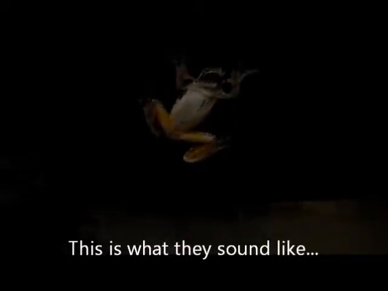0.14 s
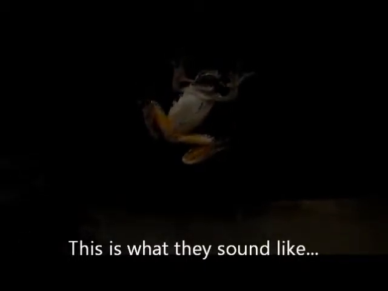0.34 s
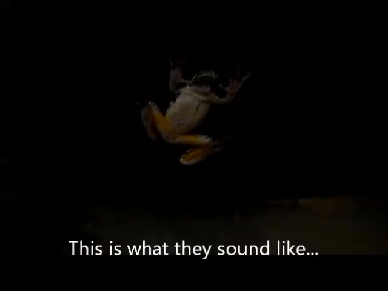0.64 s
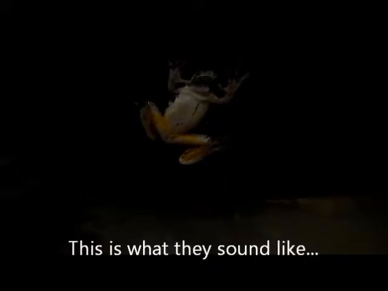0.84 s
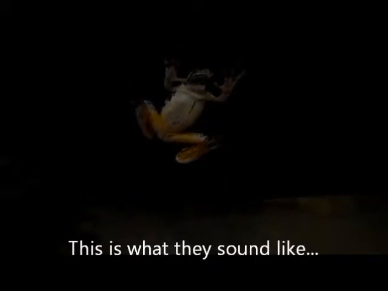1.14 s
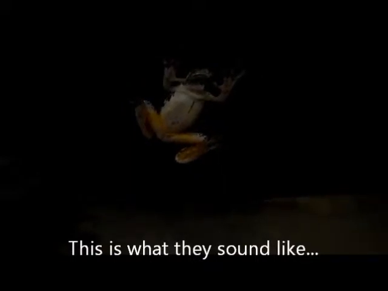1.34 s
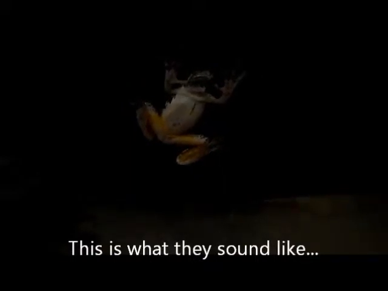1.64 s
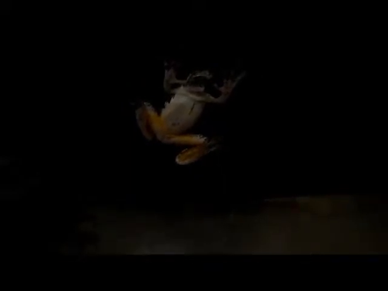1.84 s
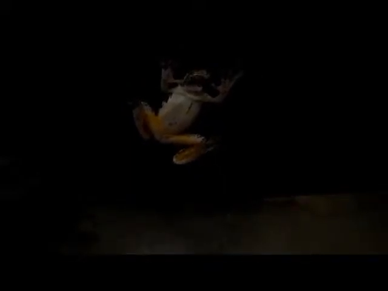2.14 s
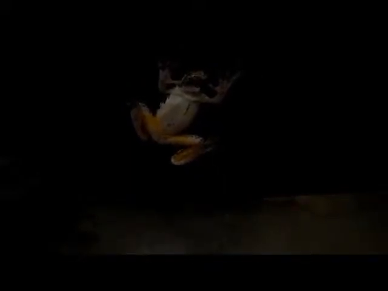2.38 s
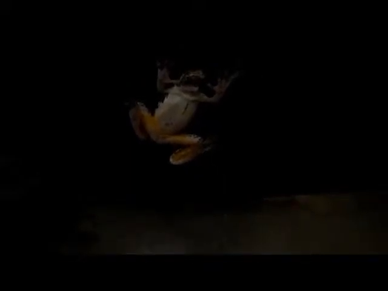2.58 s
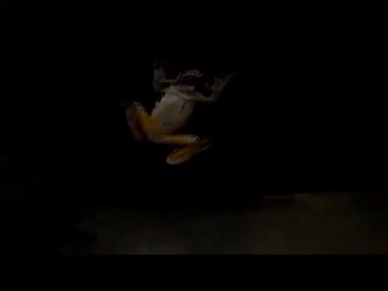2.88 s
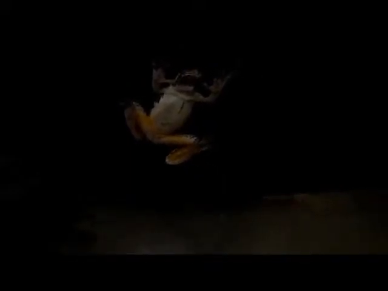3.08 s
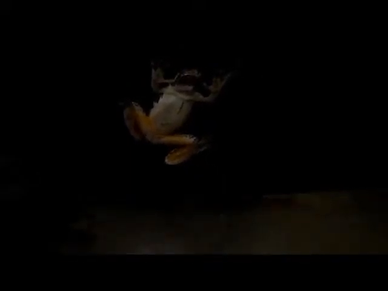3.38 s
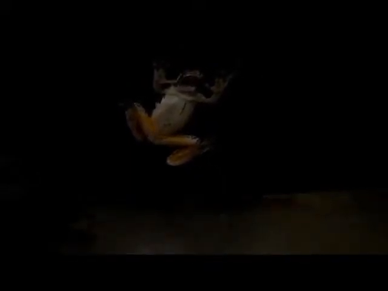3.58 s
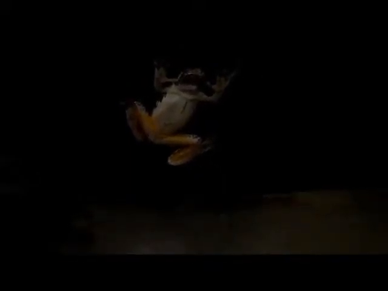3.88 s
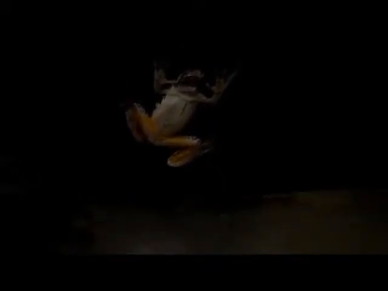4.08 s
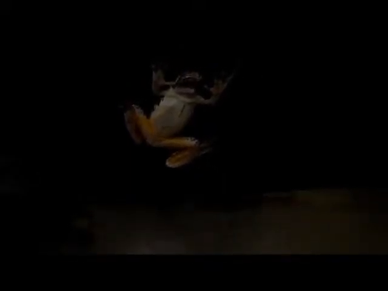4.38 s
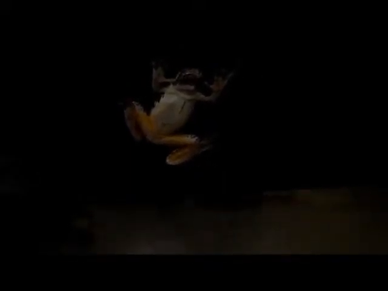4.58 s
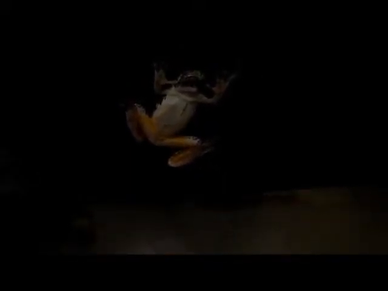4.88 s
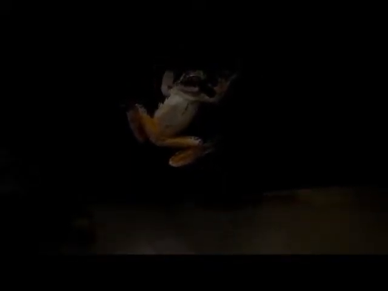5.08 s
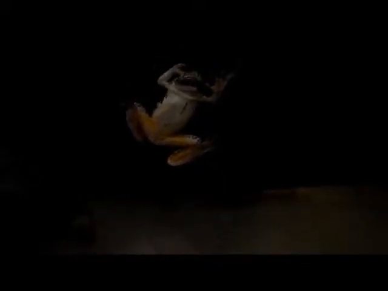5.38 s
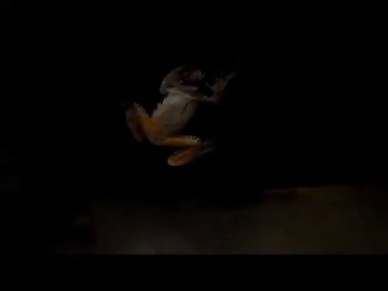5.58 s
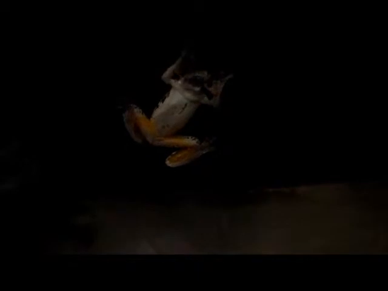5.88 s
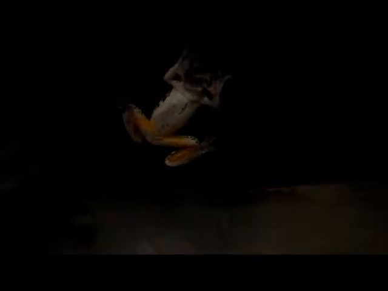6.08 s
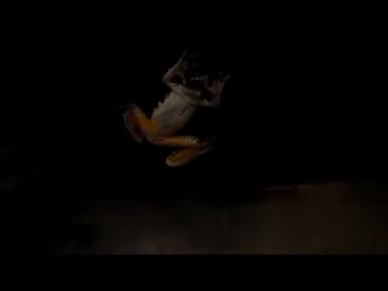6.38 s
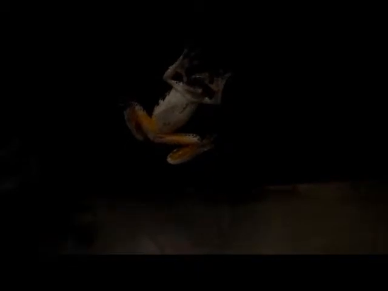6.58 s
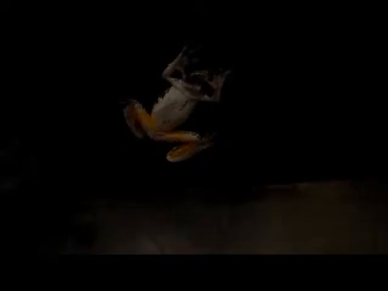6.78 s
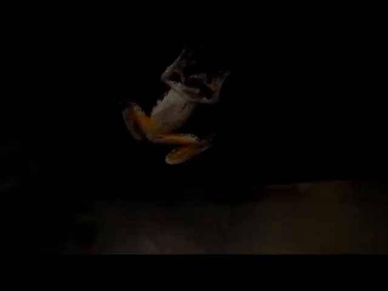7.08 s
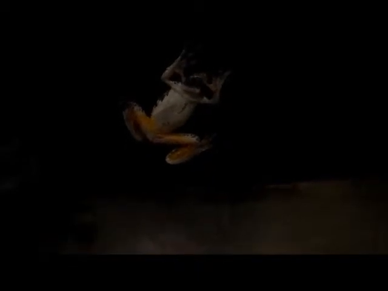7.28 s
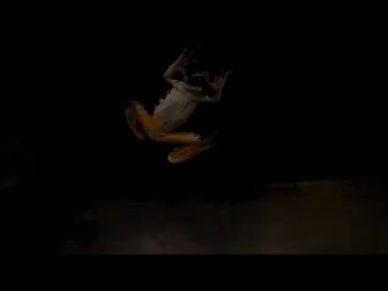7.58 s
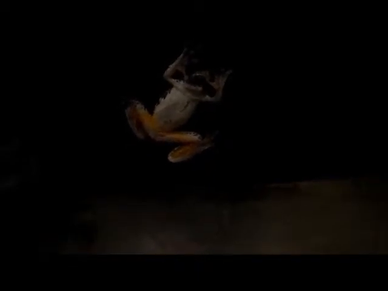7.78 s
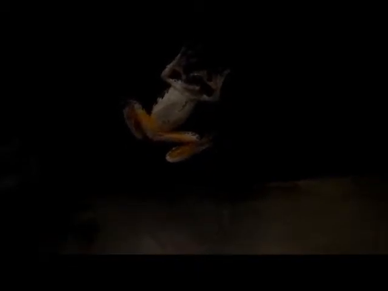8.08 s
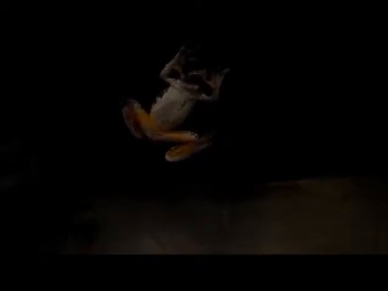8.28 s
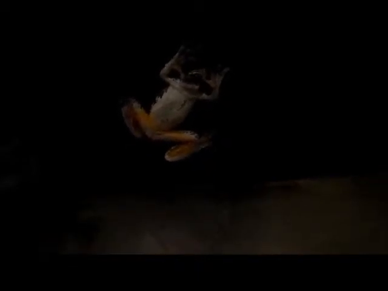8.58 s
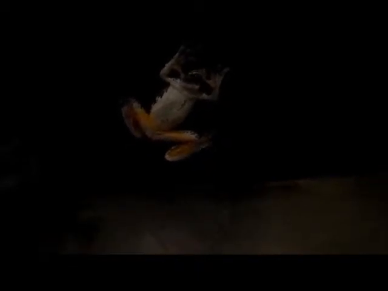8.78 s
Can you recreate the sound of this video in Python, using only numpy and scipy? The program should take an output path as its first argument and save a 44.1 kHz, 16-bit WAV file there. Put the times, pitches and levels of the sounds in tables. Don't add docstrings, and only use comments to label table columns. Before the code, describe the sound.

At a night pond, brief croaky frog trills come and go amid thin rising peeps, a high chorus drone, faint hiss and far rumble.

```python
import sys
import numpy as np
from scipy import signal
from scipy.fft import rfft, irfft, next_fast_len
from scipy.io import wavfile
from scipy.ndimage import uniform_filter1d, map_coordinates

SR = 44100
rng = np.random.default_rng(int(sys.argv[2]) if len(sys.argv) > 2 else 0)


def bounce(signal):
    frames = np.transpose(np.atleast_2d(signal))
    limited = np.clip(frames, -1, 1)
    pcm = np.round(limited * 32767).astype(np.int16)
    wavfile.write(sys.argv[1], SR, pcm)


def amplitude_ratio(level_db):
    exponent = np.asarray(level_db, float) / 20
    return 10 ** exponent


N = 394254


def unit(x):
    return x / np.sqrt(np.mean(x ** 2) + 1e-20)


def along(points, hz):
    f, v = np.transpose(points)
    return np.interp(np.log(hz + 1), np.log(f + 1), v)


def over_time(points):
    return np.interp(np.arange(N) / SR, *np.transpose(points))


def wobble(rate):
    knots = rng.standard_normal(int(N * rate / SR) + 4)
    return map_coordinates(knots, [np.arange(N) * rate / SR])


def filtered(x, response):
    m = next_fast_len(N + SR // 2)
    return irfft(rfft(x, m) * response(np.fft.rfftfreq(m, 1 / SR)), m)[..., :N]


def rush(spectrum, alike):
    def mid_side(hz):
        turn = np.arccos(np.clip(along(alike, hz), -1, 1)) / 2
        return amplitude_ratio(along(spectrum, hz)) * [np.cos(turn), np.sin(turn)]

    mid, side = filtered(rng.standard_normal((2, N)), mid_side)
    return unit(np.array([mid + side, mid - side]))


def add(track, s, sound):
    part = track[..., round(s * SR):][..., :sound.shape[-1]]
    part += sound[..., :part.shape[-1]]


def envelope(u, db, tilt_db, on, attack_db, off, release_db):
    attack = attack_db * np.clip(on - u, 0, 9) ** 2
    release = release_db * np.clip(u - off, 0, 9) ** 2
    return amplitude_ratio(db + tilt_db * u - attack - release)


# pitch_hz, level_db (per Hz)
HUM = [(53, -23), (90, -10), (118, 0.5), (177, -4.5), (200, -3.5), (252, -7.5), (546, -19.5), (992, -26.5),
       (1200, -29.5), (1410, -27.5), (2150, -33.5), (2300, -36), (2990, -34), (5060, -120)]
# pitch_hz, likeness (0..1)
HUM_ALIKE = [(40, 0.74), (130, 0.87), (300, 0.9), (700, 0.79), (1500, 0.53)]
# pitch_hz, level_db (per Hz)
DEEP = [(25, -37), (45, 4.5), (60, 4), (80, 18.5), (100, -10), (130, -50.5)]
# start_s, level_db
TRAFFIC = [(4.01, -50), (4.04, -36.5), (4.74, -50.5), (5.33, -41), (6.02, -51), (6.65, -48), (6.88, -53),
           (7.04, -47.5), (7.24, -49.5)]
HUM_DB, HUM_FOLLOWS = -38.5, 0.2
DEEP_DB, DEEP_GROWS, DEEP_SWING_DB = -47, .8, 1


def hum():
    swell_db = over_time(TRAFFIC) - np.mean(TRAFFIC, axis=0)[1]
    hum_db = HUM_DB + HUM_FOLLOWS * swell_db
    deep_db = DEEP_DB + DEEP_GROWS * swell_db + DEEP_SWING_DB * wobble(9)
    fan = np.sin(2 * np.pi * np.cumsum(178 + 2.5 * wobble(12)) / SR) * amplitude_ratio(-41.5 + 1.5 * wobble(15))
    fan += np.sin(2 * np.pi * np.cumsum(120 + 2 * wobble(10)) / SR) * amplitude_ratio(-46 + 2 * wobble(12))
    murmur = amplitude_ratio(hum_db + 1.16 * wobble(14)) * rush(HUM, HUM_ALIKE)
    rumble = amplitude_ratio(deep_db) * rush(DEEP, [(30, .4), (60, 0.99), (100, 0.24)])
    return murmur + rumble + fan


# pitch_hz, t60_s
POND = [(500, 0.065), (1000, 0.069), (2000, 0.19), (4000, 0.13)]


def pond(x):
    hz, t, z = signal.stft(rng.standard_normal((2, SR // 4)), SR, nperseg=128)
    tail = signal.istft(z * amplitude_ratio(-60 * t / along(POND, hz)[:, None]), SR, nperseg=128)[1]
    delayed = np.pad(x, (200, 0))[None]
    return signal.fftconvolve(delayed, tail / np.linalg.norm(tail[0]), axes=1)[:, :N]


def peep(length, from_hz, to_hz, db, peak, half_db=-30, tail_db=-18, sag_db=-4, bend=0.33):
    u = np.arange(-.35, 1.35, 1 / (length * SR))
    turn = 2 * np.pi * np.cumsum(from_hz + (to_hz - from_hz) * (u + bend * u * (1 - u))) / SR
    start = np.clip(u / .1 + .6, 0, 1)
    edges = start * np.clip((1.08 - u) / .2, 0, 1)
    swell = edges ** 2 * amplitude_ratio(sag_db * ((u - peak) / .5) ** 2)
    swell += amplitude_ratio(tail_db) * start * np.clip((1.35 - u) / .5, 0, 1)
    return amplitude_ratio(db - 7.5) * swell * (np.sin(turn) + amplitude_ratio(half_db) * np.sin(turn / 2))


# start_s, length_s, pitch_hz (at the start), level_db
PEEPS = [(4.012, .04, 2500, -44), (4.298, .09, 2694, -37), (4.526, .075, 2909, -33),
         (4.578, 0.14, 2665, -44.5), (4.655, .2, 2571, -40.5), (4.796, 0.064, 2817, -32.5),
         (4.883, 0.12, 2670, -33.5), (5.055, 0.073, 2910, -31), (5.063, .17, 2647, -42),
         (5.364, 0.045, 2710, -36), (5.446, 0.12, 2298, -46), (5.46, 0.147, 2700, -38.5),
         (5.494, .12, 2520, -51.5), (5.577, 0.071, 2826, -27.5), (5.778, 0.11, 2576, -47.5),
         (5.883, 0.087, 2930, -38), (6.099, 0.046, 2854, -33.5), (6.276, .07, 2630, -45.5),
         (6.568, 0.17, 2387, -48), (6.625, .1, 2730, -38), (6.781, 0.091, 2692, -38),
         (6.868, 0.087, 2880, -30.5), (6.906, 0.17, 2625, -38.5), (7.052, 0.16, 2926, -45.5),
         (5.357, 0.077, 2830, -38), (5.706, .12, 2820, -48), (6.601, .06, 2900, -54.5),
         (7.333, .1, 2406, -43), (7.341, .08, 2807, -34)]
# start_s, length_s, pitch_hz (at the start), level_db
SHRILL = [(4.116, 0.041, 3150, -45.5), (4.173, 0.04, 3120, -45.5), (4.64, 0.064, 3002, -36),
          (4.717, .1, 2900, -43.5), (5.271, .07, 2925, -45), (5.139, .11, 2948, -38.5),
          (5.57, .05, 3050, -45), (5.756, 0.069, 3010, -49.5), (6.111, 0.045, 3075, -42.5),
          (6.761, 0.055, 3034, -51), (6.89, .06, 3120, -50), (6.985, .07, 3028, -38.5),
          (7.26, 0.091, 3006, -45.5)]
# pitch_hz, level_db
CHORUS = [(2250, -37), (2550, -20), (2750, -0.5), (2950, 5), (3150, -6), (3300, -14), (3500, -33.5)]
# start_s, level_db
DRONE = [(4.001, -56), (4.4, -53.5), (4.761, -52), (4.91, -52), (6.26, -56.5), (6.59, -52), (6.97, -50),
         (7.271, -51), (7.448, -40.5)]
RISE_HZ_PER_S, RISE_GROWS, SHRILL_HZ_PER_S = 1100, 1.7, 2800
PEAK_EARLY, PEAK_LATE = .25, .7


def peepers(far_db=0.5, blur_db=-2.5, count=450):
    pair, drone_db = np.zeros((2, N)), over_time(DRONE)
    near = [(*row, RISE_HZ_PER_S + RISE_GROWS * (row[2] - 2310), PEAK_EARLY) for row in PEEPS]
    near += [(*row, SHRILL_HZ_PER_S, PEAK_LATE) for row in SHRILL]
    for (s, length, hz, db, rise, peak), pan_db in zip(near, rng.normal(0, 0.91, len(near))):
        call = peep(length, hz, hz + rise * length, db, peak)
        add(pair, s - 0.44 * length, amplitude_ratio([[pan_db], [-pan_db]]) * call)
    for when, size, note, slope, loud, pan in rng.random((count, 6)):
        s, length, hz = 3.9 + 3.6 * when, 0.0504 + 0.0583 * size, 2700 + 380 * note
        db = far_db - 9 * loud + drone_db[int(s * SR)]
        call = peep(length, hz, hz + length * (1200 + 1400 * slope), db, 0.14)
        add(pair, s, amplitude_ratio([[5 * pan - 2.5], [2.5 - 5 * pan]]) * call)
    pair *= amplitude_ratio(1.5 * np.array([wobble(90), wobble(90)]) + 2 * wobble(75))
    pair += amplitude_ratio(-1) * pond(pair.mean(axis=0))
    return pair + amplitude_ratio(drone_db + blur_db + 1.5 * wobble(14)) * rush(CHORUS, [(3000, 0.31)])


# start_s, level_db, pitch_hz, t60_s
KNOCKS = [
    (4.016, -28, 560, .06),
    (6.146, -22, 400, .022),
]


def knocks():
    out, t = np.zeros(N), np.arange(SR // 20) / SR
    for s, db, hz, t60 in KNOCKS:
        decay = amplitude_ratio(db - 60 * t / t60) * (1 - np.exp(-t / 0.00057))
        add(out, s, decay * np.sin(2 * np.pi * hz * t * (1 + 12 * t)))
    return out


# start_s, length_s, middle_pitch_hz, end_pitch_hz, puff_level_db
PULSES = [(4.0199, .037, 845, 1024, -20), (4.078, .037, 818, 963, -26.5), (4.1362, .0363, 874, 979, -24),
          (4.195, .0357, 886, 1006, -36), (4.2565, .034, 864, 1026, -20.5),
          (4.3142, .0357, 874, 1048, -24.5), (4.3744, .034, 907, 1052, -47), (4.436, .0352, 912, 1024, -18),
          (5.927, .014, 878, 1030, -40), (5.974, 0.028, 830, 950, -30.5), (6.025, .03, 856, 994, -40),
          (6.0794, .0333, 890, 1010, -23), (6.134, .0325, 883, 1010, -24), (6.191, .033, 905, 1030, -27.5),
          (6.2481, .0332, 906, 1020, -22.5), (6.307, .0338, 890, 1030, -21), (6.366, .0339, 922, 1040, -20),
          (6.4233, .0332, 901, 1053, -49), (6.482, .0334, 936, 1038, -26), (6.541, .0349, 896, 1025, -19.5)]
TRILL_STARTS = [
    3.93,
    5.926,
]
# start_s, start_pitch_shift_hz
SETTLING = [(4.02, -48), (4.08, 40.5), (4.135, 24), (4.19, -5.5), (5.9, 2), (5.93, 23), (5.976, -50),
            (6.03, -9.5), (6.08, -6.5)]
# multiple of the pitch, level_db
HIGHER = [(3, 2.5), (4, -13.5), (5, -21), (6, -25.5)]
# pitch_hz, level_db
RASP = [(500, -41), (800, -22.5), (1300, 17), (1800, 9.5), (2600, -13.5), (4200, -13), (5400, -14.5),
        (6500, -65)]
# pitch_hz, width_hz, level_db
SAC = [(1018.6, 54, -12.5), (1754, 66, 1)]
# level_db, tilt_db, on (share), attack_db, off (share), release_db
TONE = (-0.5, 2, 0.2655, 379, 0.8458, 601.5)
OCTAVE = (-1.5, -1.5, 0.36, 299, 0.6962, 220.5)
OVERTONES = (-32, 9.5, .5, 90.5, 0.73, 798.5)
TRILL_DB, TIRES_DB_PER_S = -17, -1.5
COLD_OCTAVE_DB, WARM_UP_S = -11.5, 0.04
COLD_SOFTER, COLD_LEAD_S = .17, 0.0061
LEAD_IN_DB, LEAD_IN_S, LEAD_IN_WIDE_S, SCOOP_HZ = -13.5, 0.00039, 0.0019, 68.6
CATCH_DB = 10.5


def sac_response(hz):
    return 1 + sum(amplitude_ratio(db) * 1j * hz * w / (c * c - hz * hz + 1j * hz * w) for c, w, db in SAC)


def treefrog(start_hz=740, catch_hz=775, dip_db=-8.5, dip_at=0.49, rasp_db=-24, stutter_db=-9):
    voice, breath = np.zeros(N), np.zeros(N)
    shake, smear = .006 * wobble(300), .45 * wobble(200)
    tone_flutter_db, octave_flutter_db = .6 * wobble(250), .8 * wobble(300)
    for s, length, mid_hz, end_hz, _ in PULSES:
        since = s - max(start for start in TRILL_STARTS if start < s)
        octave_db = COLD_OCTAVE_DB * np.exp(-since / WARM_UP_S)
        db = TRILL_DB + TIRES_DB_PER_S * since + COLD_SOFTER * octave_db
        lead_s = LEAD_IN_S - COLD_LEAD_S * np.exp(-since / 0.054)
        u = np.arange(-.4, 1.3, 1 / (length * SR))
        here = slice(round(s * SR), round(s * SR) + len(u))

        shift = np.interp(s, *np.transpose(SETTLING))
        pitches = [start_hz + shift, catch_hz + shift, mid_hz, end_hz, 1.044 * end_hz]
        glide = uniform_filter1d(np.interp(u, [.08, .2, .5, .83, .95], pitches), size=90, mode="nearest")
        turn = 2 * np.pi * np.cumsum(glide * (1 + shake[here])) / SR
        low, octave, high = [amplitude_ratio(db) * envelope(u, *part) for part in (TONE, OCTAVE, OVERTONES)]

        depth = np.clip((length - .0275) / .006, -.6, 1)
        dip = dip_db * depth * np.exp(-((u - dip_at) / .14) ** 2)
        dip += stutter_db * np.exp(-((u * length - .0028) / 0.00024) ** 2)
        tone = low * amplitude_ratio(dip + tone_flutter_db[here]) * np.cos(turn)
        blip = amplitude_ratio(db + LEAD_IN_DB) * np.exp(-((u * length - lead_s) / LEAD_IN_WIDE_S) ** 2)
        tone += blip * np.cos(2 * np.pi * (start_hz + shift - SCOOP_HZ) * u * length)
        tone += octave * amplitude_ratio(octave_db + octave_flutter_db[here]) * np.cos(2 * turn + 2.6)
        partials = sum(amplitude_ratio(level) * np.cos(k * turn + (k - 2) * smear[here]) for k, level in HIGHER)
        tone += high * amplitude_ratio(octave_db) * partials
        add(voice, s - .45 * length, tone)
        air = octave * amplitude_ratio(octave_db) + amplitude_ratio(CATCH_DB) * np.roll(blip, 110)
        add(breath, s - .45 * length, air * (1 + np.cos(turn)))
    return filtered(voice, sac_response) + amplitude_ratio(rasp_db) * breath * rush(RASP, [(1000, 1.0)])[0]


PUFF_HZ, PUFF_AT = 131.6, 0.95


def puffs(rise=0.0081):
    out, t = np.zeros(N), np.arange(SR // 20) / SR
    swell = (t / rise * np.exp(1 - t / rise)) ** 2.3
    for (s, length, _, _, db), chance in zip(PULSES, rng.standard_normal((len(PULSES), 1))):
        hz = PUFF_HZ * (1 + .07 * chance)
        push = np.cos(2 * np.pi * hz * (t - rise) - .8) * swell
        add(out, s + PUFF_AT * length - rise, amplitude_ratio(db - 2) * push)
    return out


def scene():
    voice = treefrog()
    late = filtered(voice, lambda hz: np.exp(-2j * np.pi * hz * np.array([[2.4], [0]]) / SR))
    echo = amplitude_ratio(-19.5) * pond(voice)
    near = late + puffs() + knocks() + echo + hum() + peepers()
    return near * amplitude_ratio([[.8], [-.8]])


# start_s, jump_s (night time minus play time), tick_level_db
SPLICES = [
    (.0002, 4.0518, -25),
    (2.986, 1.9288, -44),
    (3.629, 3.4088, -44),
    (4.007, 0, -43),
    (7.239, -2.3243, -28),
    (7.882, -.643, -45),
    (8.030, -4.0235, -43),
]


def join_pieces(dry):
    t, out, joint = np.arange(N) / SR, np.zeros_like(dry), np.zeros(N)
    ends = [row[0] for row in SPLICES[1:]] + [N]
    for (start, shift, tick_db), end in zip(SPLICES, ends):
        fade = np.clip((t - start) / .002 + (start < .001), 0, 1) - np.clip((t - end) / .002, 0, 1)
        out += fade * np.roll(dry, -round(shift * SR), axis=1)
        joint[round(start * SR)] = amplitude_ratio(tick_db)
    tick = filtered(joint, lambda hz: 5 / (1 + 1j * hz / 1800) ** 1.5)
    return out, tick


# pitch_hz, level_db (per Hz)
HISS = [(2060, -33.5), (3500, 0), (3730, -6.5), (4250, -8.5), (5570, -15), (7810, -14), (13800, -2),
        (15700, -4)]


def preamp_hiss():
    return amplitude_ratio(-55.5) * rush(HISS, [(4000, 0.31), (7000, .05)])


def patchy_band(x, from_hz=3340, to_hz=3760, often=0.13):
    hz, t, z = signal.stft(x, SR, nperseg=1024)
    rows = (hz > from_hz) & (hz < to_hz)
    chance = unit(uniform_filter1d(rng.standard_normal((len(hz) // 3 + 1, len(t))), size=7, axis=1))
    neighbours = np.abs(z[0, (hz > 2850) & (hz < 3300)]).mean(axis=0)
    loud = uniform_filter1d(np.log(neighbours + 1e-9), size=5)
    chance += 1.3 * unit(loud - np.median(loud))
    patches = np.repeat(chance, 3, axis=0)[:len(hz)] > often
    z[:, rows[:, None] & patches] *= amplitude_ratio(-25)
    return signal.istft(z, SR, nperseg=1024)[1][:, :N]


def low_pass(x):
    return signal.sosfilt(signal.butter(12, 15810, fs=SR, output="sos"), x)


def record(dry):
    out, tick = join_pieces(dry)
    mix = patchy_band(out + preamp_hiss()) + tick
    mix = filtered(mix, lambda hz: hz < 15790) - .0046
    return low_pass(mix)


dry = scene()
out = record(dry)
bounce(out)
```